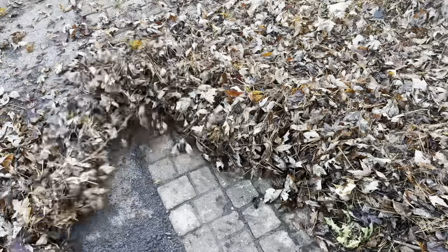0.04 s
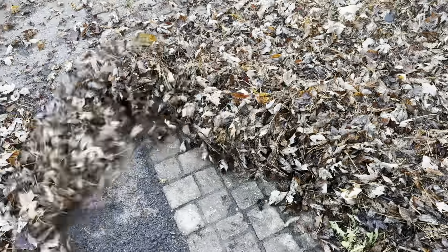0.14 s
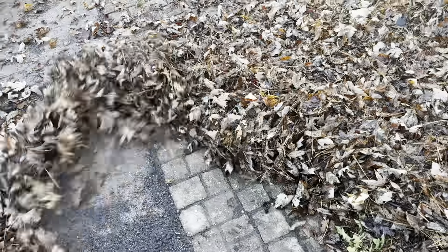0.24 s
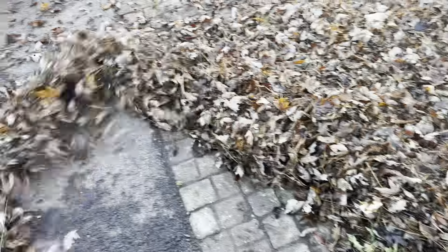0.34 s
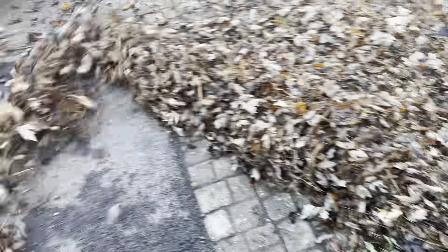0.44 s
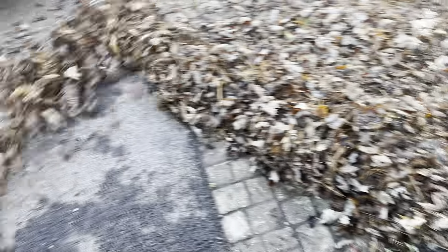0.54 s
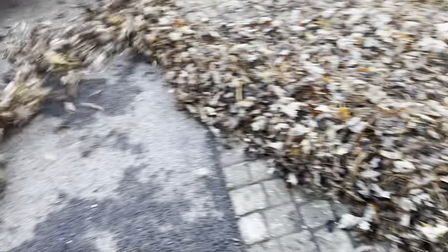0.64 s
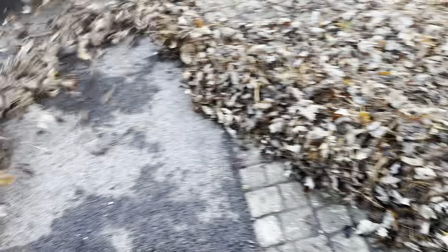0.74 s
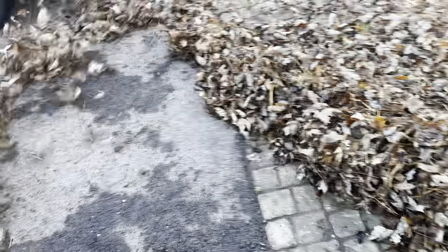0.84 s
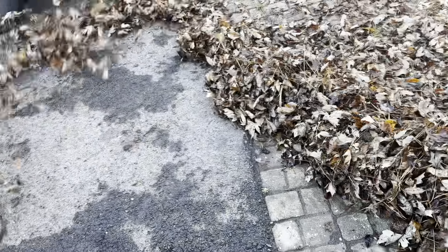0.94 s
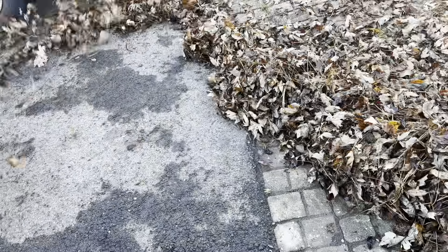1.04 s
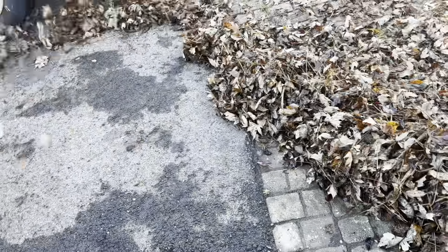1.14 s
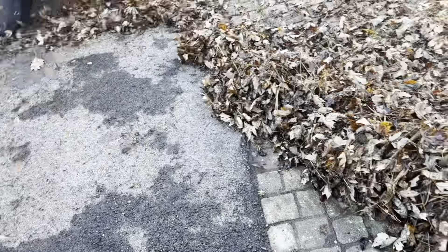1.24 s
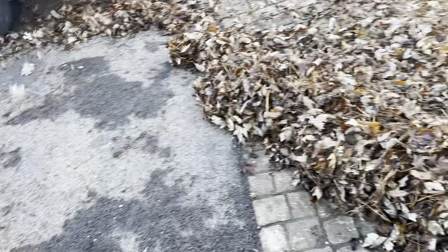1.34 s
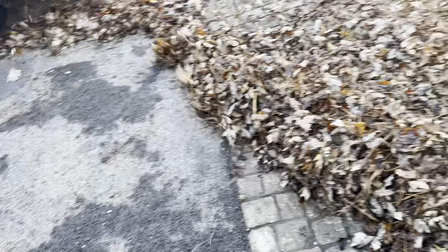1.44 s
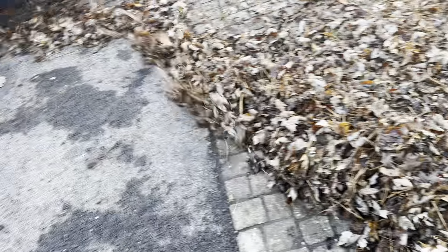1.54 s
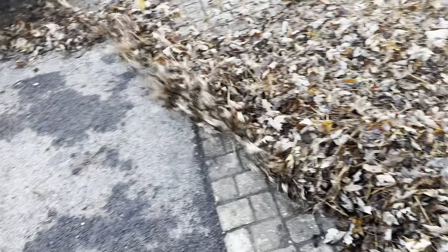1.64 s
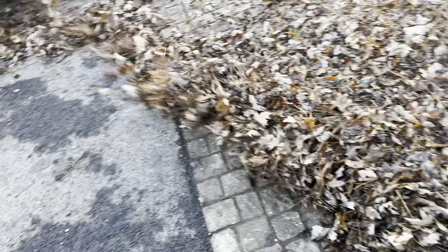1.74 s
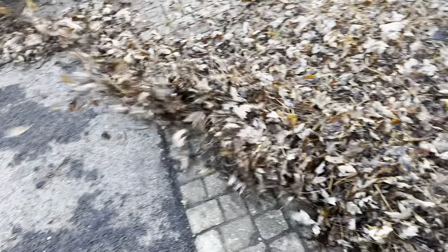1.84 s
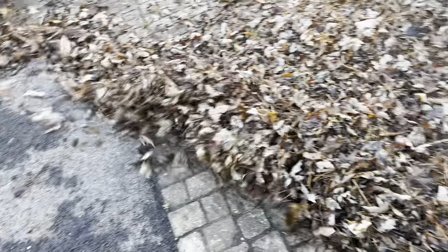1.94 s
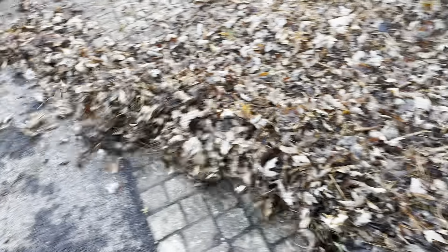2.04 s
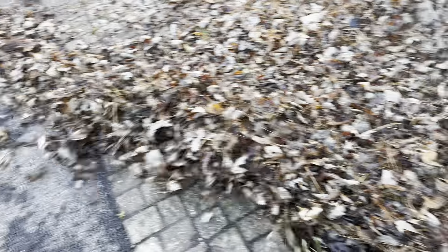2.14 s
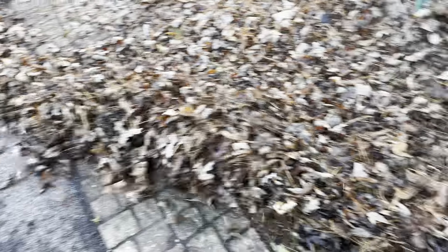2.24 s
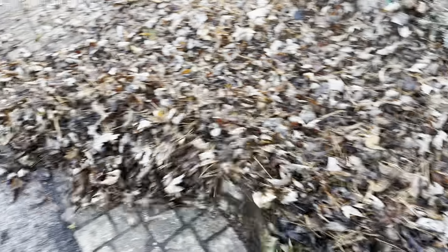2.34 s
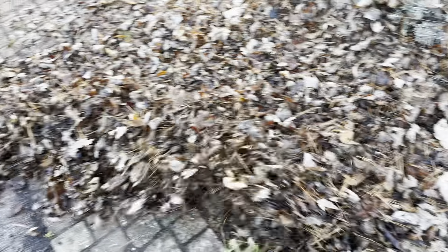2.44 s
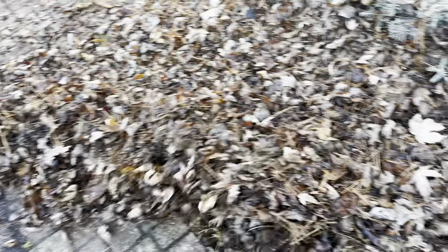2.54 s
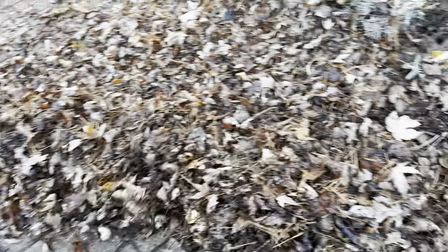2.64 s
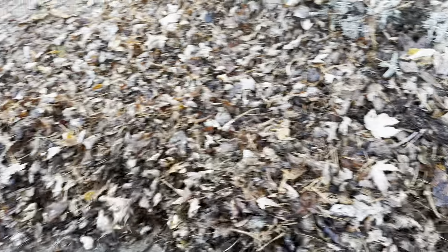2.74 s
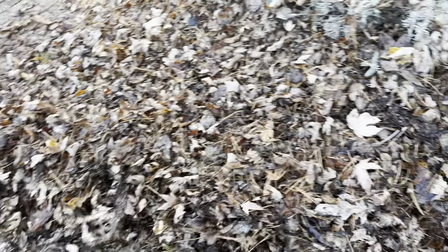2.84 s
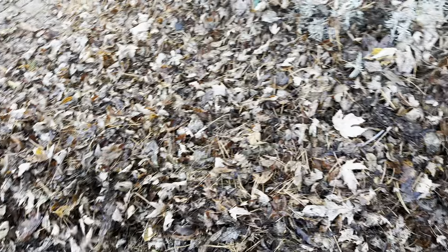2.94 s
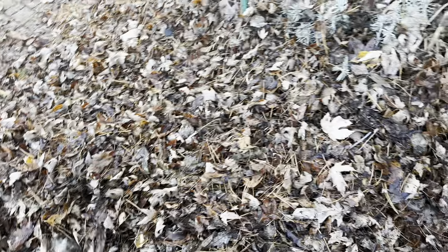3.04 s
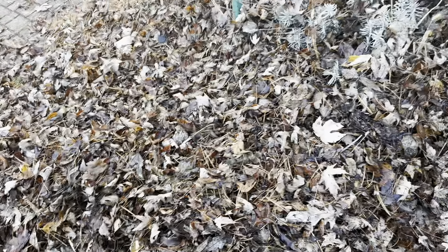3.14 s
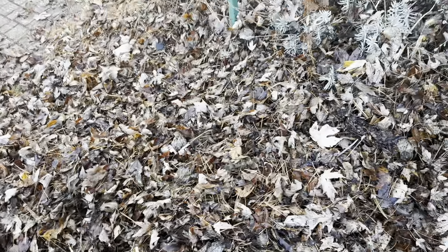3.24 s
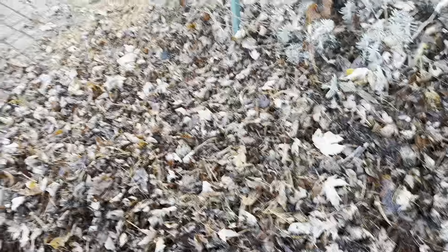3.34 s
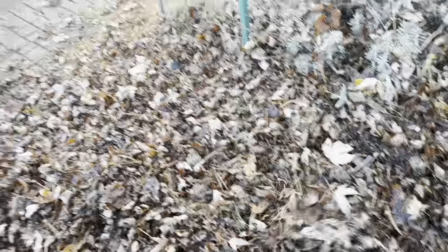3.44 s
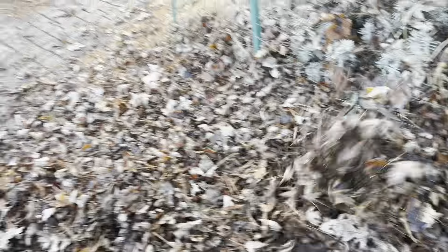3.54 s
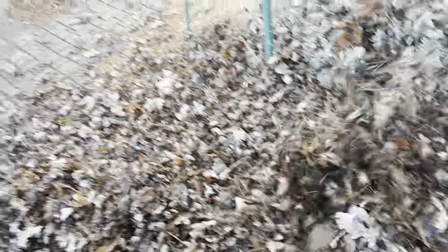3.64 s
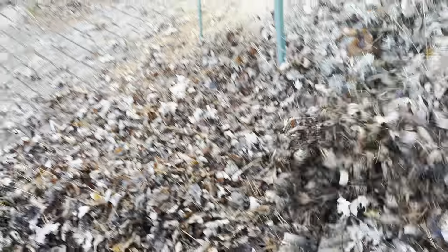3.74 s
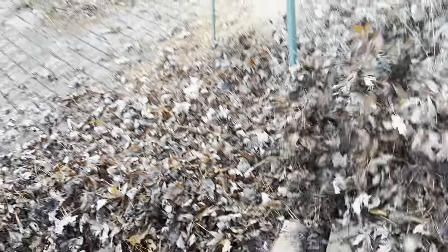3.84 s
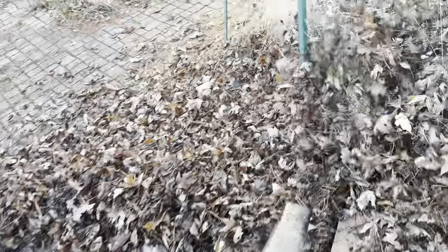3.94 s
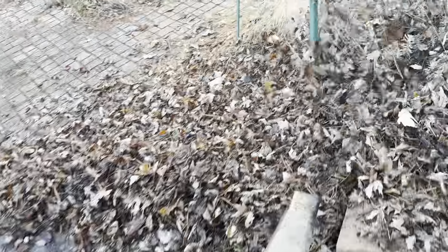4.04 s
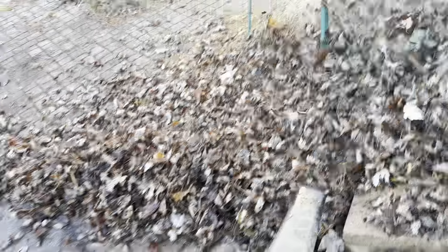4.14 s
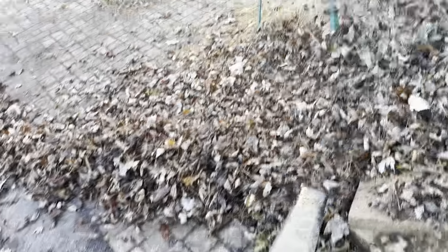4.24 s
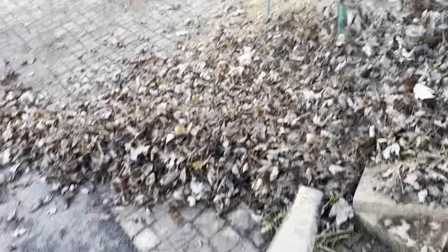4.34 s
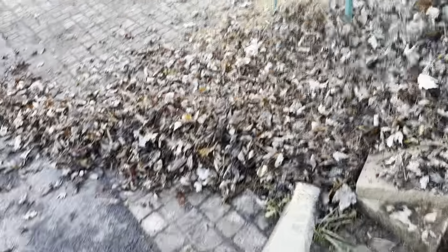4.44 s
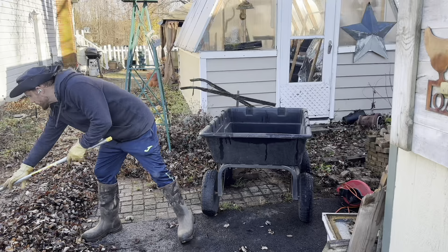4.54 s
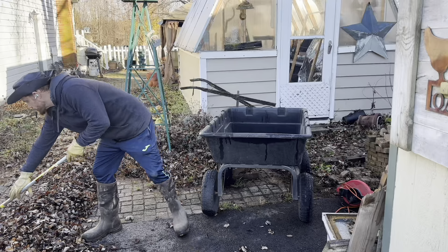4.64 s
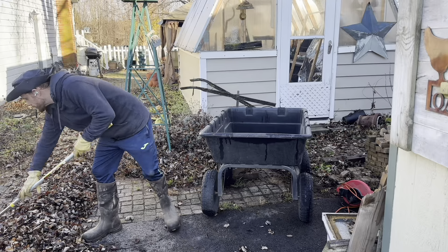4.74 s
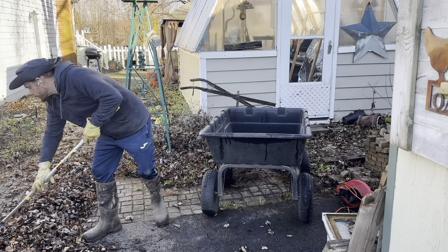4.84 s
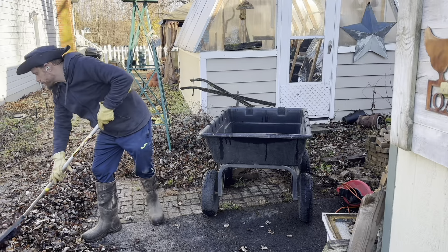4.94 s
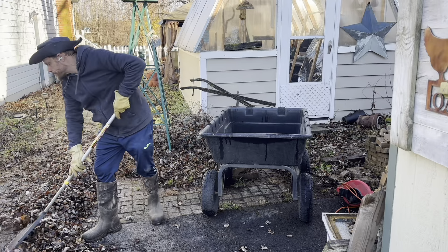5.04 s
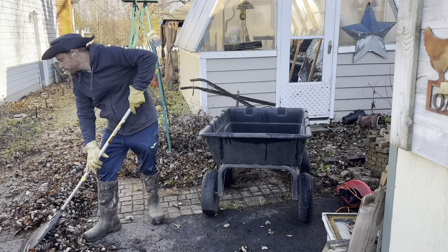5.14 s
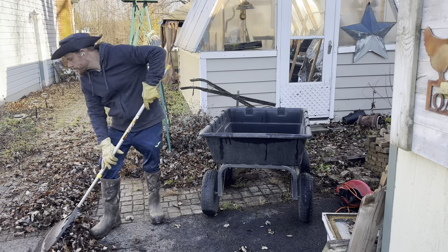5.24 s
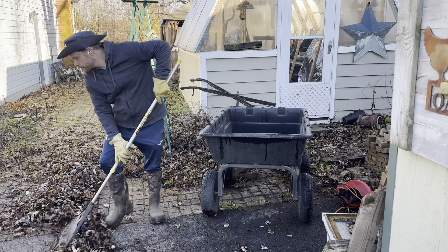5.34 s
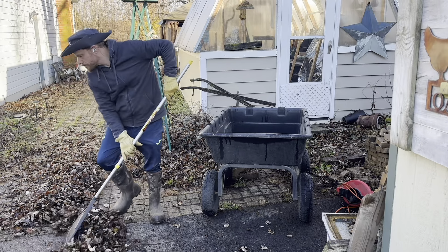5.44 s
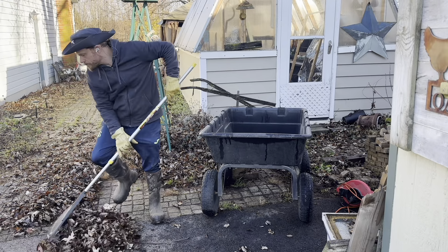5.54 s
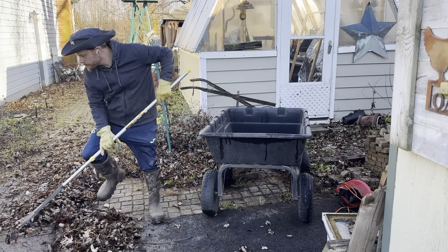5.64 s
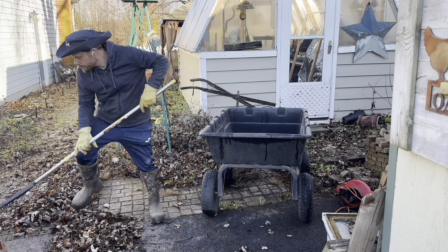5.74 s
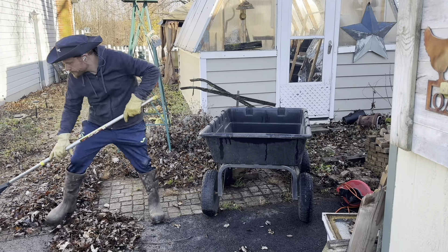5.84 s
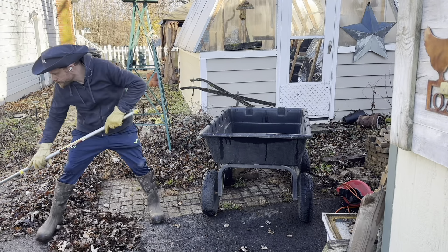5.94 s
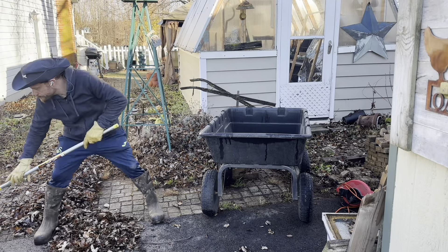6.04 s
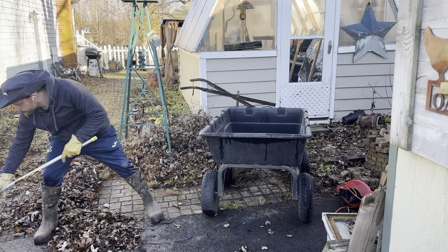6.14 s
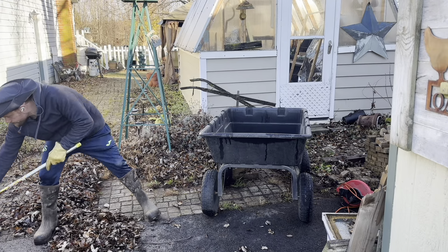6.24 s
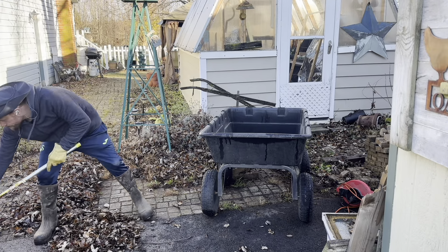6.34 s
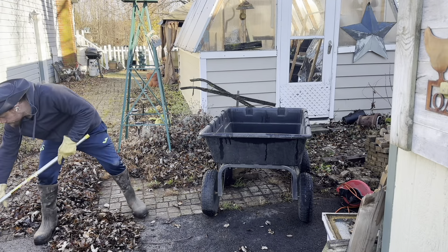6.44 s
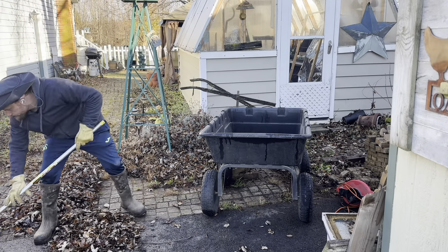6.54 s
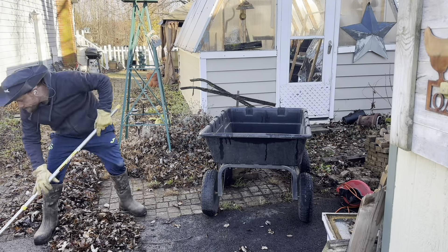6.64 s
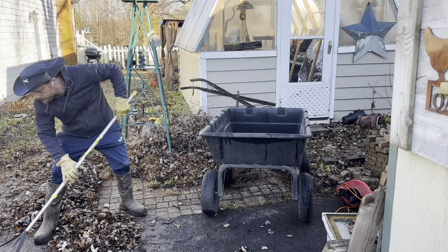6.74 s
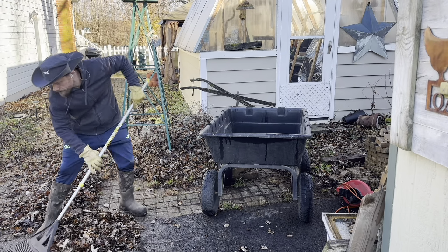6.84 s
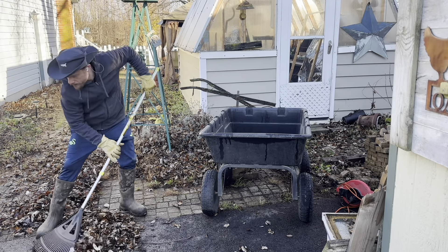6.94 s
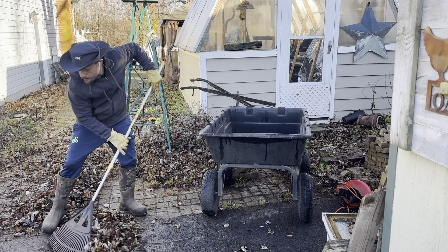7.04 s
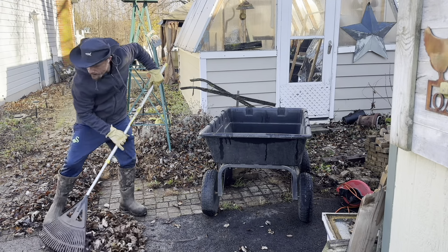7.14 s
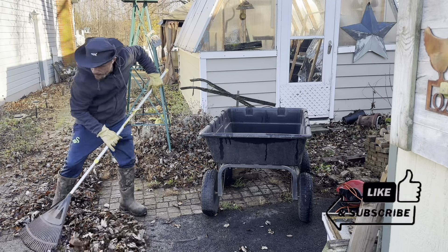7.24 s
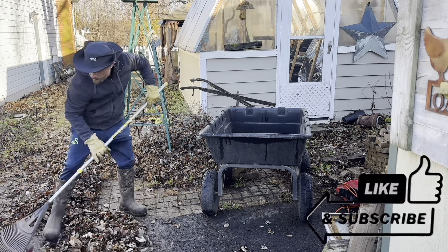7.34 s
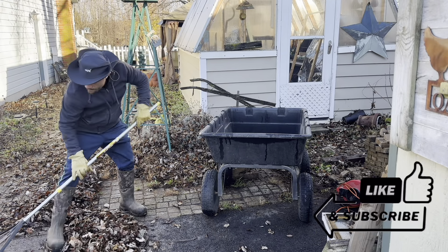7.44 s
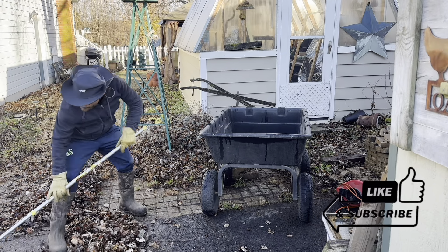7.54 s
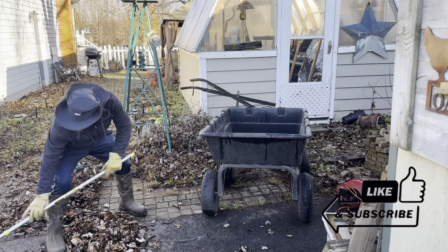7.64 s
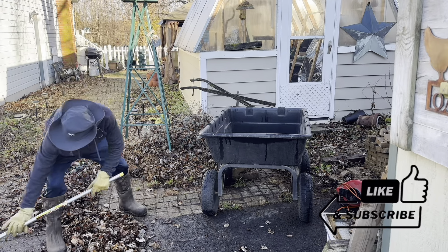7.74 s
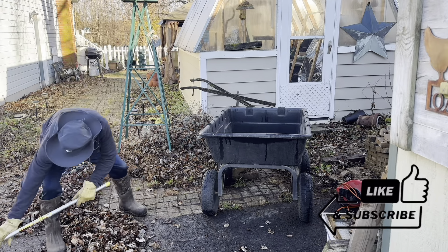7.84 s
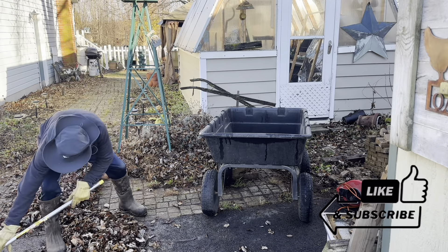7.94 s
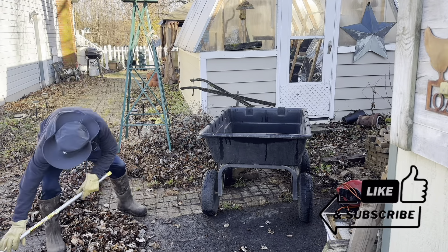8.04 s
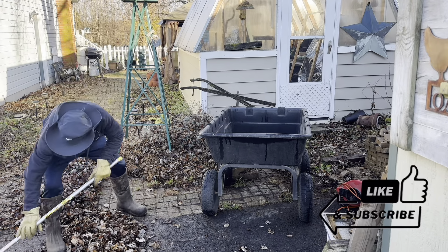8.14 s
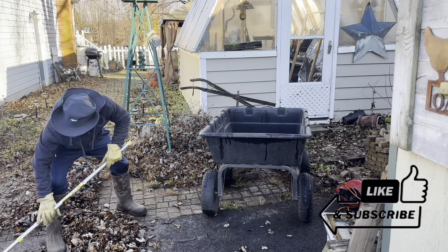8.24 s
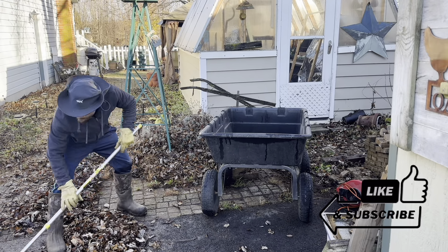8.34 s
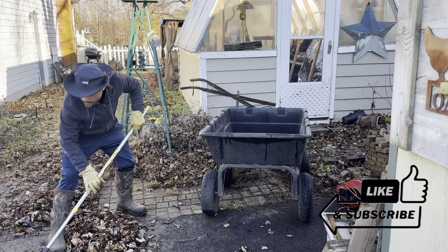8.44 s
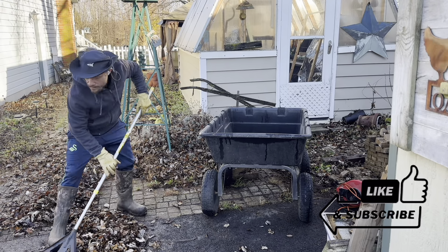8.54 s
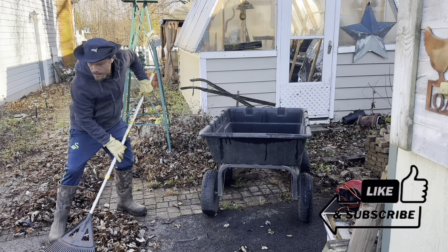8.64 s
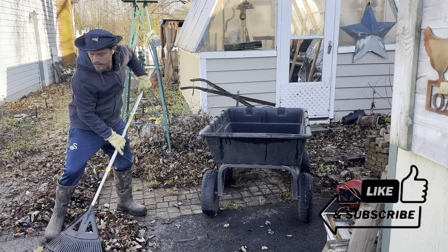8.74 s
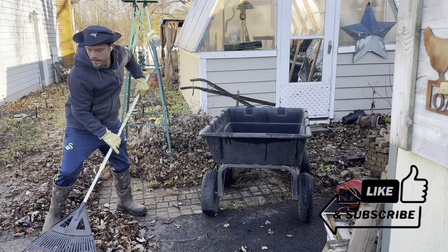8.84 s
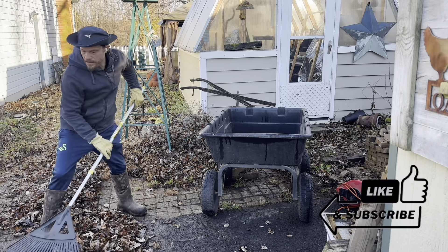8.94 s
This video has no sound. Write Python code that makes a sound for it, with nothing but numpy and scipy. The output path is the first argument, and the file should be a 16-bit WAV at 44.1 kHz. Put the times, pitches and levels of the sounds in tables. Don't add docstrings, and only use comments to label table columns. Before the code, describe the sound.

Handheld blower's steady rushing air and high fan whine stop dead; a plastic rake crackles through dry leaves in separate strokes over faint traffic rumble.

```python
import sys
import numpy as np
from scipy import signal
from scipy.io import wavfile
from scipy.ndimage import uniform_filter1d

SR = 44100
rng = np.random.default_rng(int(sys.argv[2]) if len(sys.argv) > 2 else 0)


def pcm_store(signal):
    levels = np.round(np.clip(np.atleast_2d(signal), -1, 1) * 32767)
    wavfile.write(sys.argv[1], SR, levels.astype(np.int16).T)


def ratio(d):
    e = np.asarray(d, float) / 20
    return 10 ** e


N = 396900
CUT_S = 4.541
T = np.arange(N) / SR
SIZE = 2048
HZ, FRAME_S, _ = signal.stft(T, SR, nperseg=SIZE)

# start_s, tube_roar_db, ground_echo_lag_ms
NOZZLE_PATH = [(0, -25.0, 2.81), (0.28, -28.9, 2.86), (0.51, -27.8, 2.93), (0.84, -27.0, 2.99),
               (1.06, -26.6, 3.04), (1.34, -27.6, 2.88), (1.47, -28.0, 3.0), (1.76, -27.7, 2.93),
               (2.27, -26.5, 2.83), (2.58, -25.6, 2.7), (2.7, -25.8, 2.86), (2.8, -25.9, 2.73),
               (3.19, -25.3, 2.87), (3.36, -25.9, 2.76), (3.58, -25.7, 3.38), (3.95, -25.0, 3.21),
               (4.24, -26.0, 3.27), (4.54, -24.0, 3.3)]
# pitch_hz, level_db (per Hz)
LEAF_MID = [(88, -52), (150, -24), (244, -16), (391, -7.5), (662, -11), (837, -8), (2450, -7), (4580, -1.5),
            (7470, -3), (8070, -6.5), (9440, 2), (11000, -11.5), (15100, -23), (16000, -39)]


def level(x, db):
    return x * ratio(db) / np.sqrt(np.mean(x ** 2))


def shape(table):
    hz, db = np.transpose(table)
    return np.interp(np.log(HZ + 1), np.log(hz), db)[:, None]


def around(hz, octaves):
    return np.exp(-.5 * (np.log2((HZ + 1) / hz) / octaves) ** 2)[:, None]


def bell(t, s, width_s):
    return np.exp(-.5 * ((t - s) / width_s) ** 2)


def swells(t, table):
    return sum(db * bell(t, s, length_s) for s, length_s, db in table)


def resonances(table):
    return sum(db / (1 + ((HZ[:, None] - hz) / (.5 * width_hz)) ** 2) for hz, width_hz, db in table)


def colour(x, db, turn=0):
    z = signal.stft(x, nperseg=SIZE)[2]
    return signal.istft(z * ratio(db) * np.exp(1j * turn), nperseg=SIZE)[1][..., :N]


def walk(rate):
    held = np.repeat(rng.standard_normal(int(N / SR * rate) + 2), 16)
    smooth = uniform_filter1d(uniform_filter1d(held, 16), 16)
    return np.interp(T * rate * 16, np.arange(len(held)), 1.3 * smooth)


def patches(rate, count=24, order=3):
    k = max(int(SR / rate / (SIZE // 2)), 1)
    rows = rng.standard_normal((count, len(FRAME_S)))
    rows = uniform_filter1d(uniform_filter1d(rows, k), k)
    place = np.clip(order * np.log2((HZ + 1) / 70), 0, count - 1.001)
    low, part = place.astype(int), (place % 1)[:, None]
    return ((1 - part) * rows[low] + part * rows[low + 1]) / rows.std()


def port_turn(ports, wander):
    lead, balance = ports
    right = ratio(-shape(balance)) * np.exp(-1j * np.interp(HZ, *np.transpose(lead))[:, None])
    return np.angle((1 - right) / (1 + right)) + wander * patches(1.8)


def grains(rate, scatter_db, tail_s, hiss, apart):
    chance = rng.random((2, N))
    size_db = scatter_db * np.minimum(-np.log(1 - chance[1]), 3)
    clicks = (chance[0] < rate / SR) * ratio(size_db)
    bursts = signal.lfilter([1], [1, -np.exp(-2 / (tail_s * SR))], clicks ** 2)
    mid, other = np.sqrt(bursts / bursts.mean() + hiss ** 2) * rng.standard_normal((2, N))
    return np.array([level(mid, 0), level(mid + apart * other, 0)])


def yard():
    # pitch_hz, level_db (per Hz)
    road_spectrum = [(12, -47), (20, -22), (55, 1), (65, 11), (73, 17), (82, 11), (145, -13.5), (168, -9),
                     (200, -23), (253, -18.5), (300, -20.5), (390, -49), (660, -120)]
    # pitch_hz, level_db (per Hz)
    air_spectrum = [(120, -22), (200, -2), (283, -4.5), (360, -8.5), (538, -7), (1680, -25), (5130, -20.5),
                    (8120, -20), (10700, -24), (13600, -35), (16000, -27.5)]
    # peak_s, length_s, level_db (over the base)
    vehicles = [
        (4.55, 0.18, 4.8),
        (5.151, .1, 3),
        (6.05, 0.44, 4),
        (7.3, 0.39, 2.5),
        (7.95, .15, 4),
        (8.85, .15, 5),
    ]
    swell_db = -45 + swells(T, vehicles) + 1.54 * walk(6)
    road = colour(rng.standard_normal((2, N)), shape(road_spectrum))
    road /= np.sqrt(uniform_filter1d(road ** 2, SR // 12))
    road = road * ratio(swell_db + np.array([[0.3], [-17]]))
    road[1] -= .07 * road[0]
    air_db = shape(air_spectrum) + 6.5 * around(9400, .1) + 1.3 * patches(3.2)
    air = level(colour(rng.standard_normal((2, N)), air_db), -53.5)
    return road + air * ratio(np.array([[0.3], [-2.5]]))


def drone():
    # peak_s, length_s, level_db
    labours = [
        (5.05, .12, -44),
        (5.87, .07, -41),
        (6.2, .3, -38),
        (7.2, .33, -41),
        (7.5, .1, -40),
    ]
    engine_hz = 73 * (1 + .02 * walk(5))
    note = np.sin(2 * np.pi * np.cumsum(engine_hz) / SR) * ratio(3 + 1.5 * walk(9))
    note *= sum(ratio(db) * bell(T, s, length_s) for s, length_s, db in labours)
    return np.array([note, -.07 * note])


def roll():
    # peak_s, length_s, level_db
    lorries = [
        (4.68, .12, -45),
        (5.3, .15, -48),
        (5.72, .2, -39.5),
        (6.25, .2, -43),
        (7.2, .12, -48),
        (7.55, .13, -41.5),
    ]
    band = signal.butter(4, [40, 112], "bandpass", fs=SR, output="sos")
    noise = level(signal.sosfilt(band, rng.standard_normal(N)), 0)
    noise /= np.sqrt(uniform_filter1d(noise ** 2, SR // 10))
    noise *= np.sqrt(sum(ratio(db) ** 2 * bell(T, s, length_s) for s, length_s, db in lorries))
    return np.array([noise, -.07 * noise])


def knock():
    # pitch_hz, level_db, t60_s
    modes = [(111, -30, 0.17), (168, -33, 0.095), (335, -37, .05), (520, -29, .035), (690, -28, 0.025),
             (979.3, -39, 0.035), (1560, -40, .04), (2140, -41, 0.11)]
    ring, start = np.zeros(N), int(5.949 * SR)
    for hz, db, t60 in modes:
        lag_s = .009 if hz < 250 else .0004
        t = np.maximum(T[:SR // 4] - lag_s, 0)
        soft_start = np.minimum(t * hz, 1)
        ring[start:start + len(t)] += ratio(db - 60 * t / t60) * np.sin(2 * np.pi * hz * t) * soft_start
    return np.array([ring, .25 * ring])


def cracks():
    # start_s, peak_db, low_body_db (relative), t60_s
    blows = [(4.6154, -13.5, -31, 0.066), (4.6359, -14, -9.5, 0.03), (4.653, -12.5, -26, 0.023),
             (4.7844, -17, -31, 0.033), (4.7985, -26, -13, 0.04), (4.8475, -11, -29, 0.033),
             (4.9761, -19.5, -27, 0.04), (5.8496, -31, -13, 0.04), (5.9485, -25, -8, .02),
             (5.9518, -22, 1, 0.03), (6.1487, -33, -17, 0.052), (6.237, -23, -9, 0.043),
             (6.3093, -12, -34, 0.054), (6.5634, -24, -21, 0.033), (7.0077, -21, -23, 0.064),
             (7.3322, -34, -22, 0.03), (7.3647, -34, -20, .025), (7.3755, -38, -6, .02),
             (7.484, -31, -7, 0.049), (7.5044, -33, -2, 0.03), (7.5474, -40, -6, 0.03),
             (7.558, -36, -22, .02), (7.5792, -35, -25, .02), (7.597, -40, -14, .03), (7.62, -44, -3, .02),
             (7.885, -27, -21, 0.032), (7.9087, -12.5, -18, 0.05), (8.0644, -21, -17, 0.04),
             (8.1125, -11, -29, 0.04)]
    snap_db = shape(LEAF_MID) + 4 * around(8200, .15) + 9 * around(13500, .4)
    snap = level(colour(rng.standard_normal((2, N)), snap_db), 0)
    body = level(colour(rng.standard_normal((2, N)), 40 * around(530, 2.0)), 0)
    out = np.zeros((2, N))
    for s, db, low_db, t60 in blows:
        i = int(s * SR)
        t = T[:min(SR // 4, N - i)]
        burst = snap[:, i:i + len(t)] * ratio(db - 7.5 - 60 * t / t60)
        burst += body[:, i:i + len(t)] * ratio(db + low_db - 8.0 - 60 * t / (2.4 * t60))
        burst *= np.minimum(t / 0.0012, 1)
        out[0, i:i + len(t)] += burst[0]
        out[1, i:i + len(t)] += .6 * burst[1] + .15 * burst[0]
    return out


def pull(t):
    # land_s, full_pull_s, lift_s, leaves_db, bare_paving_db
    drags = [(4.612, 4.803, 4.88, -26.4, 1.7), (4.928, 4.975, 5.37, -42.5, 6.5),
             (5.121, 5.263, 5.371, -37.5, 1.5), (5.42, 5.461, 5.57, -45, -2.5),
             (5.55, 5.602, 5.87, -53.1, -1.5), (5.777, 5.88, 5.97, -50, -4), (6.138, 6.16, 6.351, -55, -4),
             (6.234, 6.577, 6.903, -26, 1.5), (7.03, 7.087, 7.12, -42.5, -1), (7.12, 7.16, 7.5, -53, -3.5),
             (7.29, 7.448, 7.49, -44.5, -1), (7.46, 7.482, 7.516, -47, 12), (7.52, 7.55, 7.61, -54.4, 2),
             (7.6, 7.66, 7.9, -62, -2), (7.882, 7.892, 7.95, -29, -2.5), (7.973, 8.058, 8.58, -23, -2.5),
             (8.66, 8.7, 8.76, -47.5, 3), (8.75, 8.8, 9.9, -51.5, 2.5), (8.883, 8.97, 8.8, -48.5, -1)]
    # peak_s, length_s, level_db
    load_swells = [(6.255, .02, 1), (6.41, .03, -1.5), (6.47, .025, 1), (6.53, .03, -1.5), (6.625, .025, 2),
                   (6.69, .02, -1), (6.8, .015, -2), (6.84, .02, 1), (6.925, .015, 1.5), (6.955, .015, -2),
                   (7.44, .04, 1.5), (7.61, .02, 2), (7.915, .015, 1.5), (7.97, .03, -3.5), (8.05, .015, 1),
                   (8.09, .012, -2.5), (8.15, .015, 1.5), (8.19, .025, -1.5), (8.3, .05, 2), (8.39, .015, -1),
                   (8.425, .015, 2.5), (8.475, .03, 2), (8.6, .02, -2)]
    rise_db, sag_db_per_s = 9, 5.5
    power, paving, late = 1e-12, 0, 0
    for land, full, lift, db, paving_db in drags:
        stop_db_per_s = 260 if db < -40 else 112 + 9 * max(db + 26.0, 0)
        rising = np.clip((full - t) / (full - land), 0, 1)
        db = db - rise_db * rising - sag_db_per_s * np.maximum(t - full, 0)
        part = (t >= land) * ratio(db - stop_db_per_s * np.maximum(t - lift, 0)) ** 2
        power = power + part
        paving = paving + part * paving_db
        late = late + part * np.clip((t - full) / (lift + 0.063 - full), 0, 1) ** 2
    return 10 * np.log10(power) + swells(t, load_swells), paving / power, late / power


def rings(s, db, hz, t60, spread):
    t = T[:int(.017 * SR)]
    chance = rng.standard_normal((len(s), 9))
    wave = 0
    for k in range(4):
        partial_hz = np.minimum(hz * np.exp(spread * chance[:, k]), 15000)[:, None]
        wave = wave + np.sin(2 * np.pi * (partial_hz * t + chance[:, k + 4, None]))
    wave *= ratio(db[:, None] - 6.5 - 60 * t / t60) * np.minimum(t / 0.0011, 1)
    at = (np.minimum((s * SR).astype(int), N)[:, None] + np.arange(len(t))).ravel()
    leaning = wave * (.15 + 0.49 * chance[:, 8:])
    mid, side = (np.bincount(at, w.ravel(), N + len(t))[:N] for w in (wave, leaning))
    return np.array([mid, side])


def snaps():
    # start_s, peak_db, pitch_hz
    stiff = [(4.6764, -22, 4120), (4.7197, -21, 3930), (4.7454, -13, 5200), (4.7985, -10, 5100),
             (4.9284, -14, 9260), (5.0864, -27, 5690), (5.2574, -24, 4760), (5.2934, -23, 9300),
             (5.4744, -27, 9760), (6.3744, -20, 9970), (6.4264, -16, 7150), (6.4604, -11, 6000),
             (6.6114, -11, 4940), (6.6374, -6, 4610), (6.7274, -14, 4520), (6.775, -11, 4700),
             (6.8364, -12, 5940), (6.8774, -13, 9360), (6.9154, -16, 9150), (8.0384, -12, 7450),
             (8.0744, -13, 3550), (8.1514, -13, 3850), (8.235, -13, 4460), (8.2824, -6, 8200),
             (8.3294, -11, 8900), (8.4198, -6, 9140), (8.4614, -9, 9200), (8.5264, -14, 9270),
             (8.5544, -10, 9140)]
    crinkles_per_s, crinkle_hz, crinkle_octaves = 500, 6000, .45
    chance = rng.random((2800, 4)).T
    s = CUT_S + np.cumsum(-np.log(1 - chance[0])) / crinkles_per_s
    hz = crinkle_hz * 2 ** (crinkle_octaves * np.log(chance[1] / (1 - chance[1])) / 1.7)
    db = pull(s)[0] - 1.5 + 2.6 * np.minimum(-np.log(1 - chance[2]), 3)
    at, peak_db, pitch_hz = np.transpose(stiff)
    crinkles = rings(s, db, hz, t60=.015, spread=0.0603)
    return crinkles + rings(at, peak_db - 6.5, pitch_hz, t60=.03, spread=.14)


def rake():
    # pitch_hz, level_db (per Hz)
    leaf_side = [(88, -57), (150, -30), (414, -18.5), (612, -12), (689, -9.5), (1080, -8), (6140, -6),
                 (8230, 5.5), (9630, 1), (10800, -34), (13200, -38), (14800, -15), (16000, -31)]
    # pitch_hz, left_lead_rad; then pitch_hz, left_minus_right_db
    rake_ports = [
        [(0, -3), (520, -5), (1290, 4.2), (1890, -0.55), (3270, 0), (4220, 10), (6030, 0.7), (8270, 3.5), (9990, -15), (10400, 4), (14000, 4), (14400, -1), (15400, -2.7), (15900, -4)],
        [(60, -1.0), (110, -4), (200, 2), (380, -1), (700, 0.5), (1290, 1), (2380, 1.5), (4400, 2.5), (8120, 2), (15000, -6)],
    ]
    # pitch_hz, width_hz, level_db
    tines = [(1710, 260, 1.5), (3500, 210, 1.5), (4530, 260, 1.5), (5070, 300, 2.5), (6100, 500, -2),
             (7300, 400, 1.5)]
    push_db = np.interp(T, T[::32], pull(T[::32])[0])
    load_db, paving_db, late = pull(FRAME_S)
    light_db = np.clip(-23.5 - load_db, 0, 22.0)
    rate = 350 * ratio(0.17 * (push_db + 31.0))
    rustle = grains(rate, 2.2, .003, 1.8, .6) * ratio(.7 * walk(60))
    moving = 1.1 * patches(40) + 1.6 * patches(14, count=96, order=12)
    moving += resonances(tines)
    moving += around(490, 0.76) * (2.0 + 0.32 * light_db + 0.65 * paving_db - 1.5 * late)
    moving += around(1580, 0.69) * (-.3 + 0.21 * light_db + paving_db + 6.2 * late)
    moving += around(11200, 0.47) * (-4.5 + 0.34 * light_db + 0.15 * paving_db + 3.4 * late)
    mid = colour(rustle[0], shape(LEAF_MID) + moving)
    side = colour(rustle[1], shape(leaf_side) + moving - 1.0, port_turn(rake_ports, 0.51))
    return np.array([mid, side]) * ratio(push_db + 6.5)


def whine():
    # shaft_order, direct_db, echo_share (0-1), echo_offset_cycles, cross_port_db
    echoed = [
        (12, -34.5, 0.89, 0.021, -49.5),
        (23, -35.5, 0.07, 0.58, -42),
        (24, -34.5, 0.76, 0.51, -37.5),
        (36, -49, 0.55, 0.56, -58),
    ]
    # shaft_order, level_db
    steady_tones = [(2, -36), (22, -54), (25, -48), (26, -61)]
    # shaft_order, level_db (relative)
    upper_tones = [(48, -1), (60, -8), (72, -5)]
    # shaft_order, peak_s, length_s, level_db
    tone_swells = [(12, 0, 0.23, 2.6), (12, 1.02, .06, -10), (12, 0.75, .08, 3), (12, 2.75, .1, -5.5),
                   (12, 3, 0.1, 4), (12, 3.47, 0.057, -2.5), (12, 4.5, 0.12, 2), (23, 1, .1, 3),
                   (23, 1.7, .15, 1.5), (23, 1.7, .12, -1), (23, 3.5, .2, -2), (24, 0.98, .07, 3),
                   (24, 1.15, .05, -6), (24, 1.43, .04, -3), (24, 1.83, .08, 3.5), (24, 2.13, .06, -5),
                   (24, 2.53, .04, 5), (24, 2.68, .06, -2), (24, 3.78, .08, -2.5), (24, 4, 0.33, 1.4),
                   (36, 0.9, .15, 4.5), (36, 2, .3, -4), (2, 2.2, .25, -2), (2, 4.2, .35, -2.5),
                   (24, .85, .07, -3), (23, .05, .08, 3), (23, 2.45, .06, -3), (23, 2.75, .05, -3),
                   (25, .6, .15, 4), (25, 1, .08, -5), (25, 1.5, .25, 4), (25, 3.8, .15, 3), (22, .1, .15, 5),
                   (22, 1.85, .1, 5), (22, 4.4, .1, 6), (36, 3.36, .06, 4), (36, 3.75, .08, 3),
                   (22, 2.8, .6, -8.1), (25, 2.5, .6, -8.1)]
    blades, blade_hz = 12, 1456.5
    surge_s, surge_up_s, surge_down_s = 3.25, .2, .33
    t = T[T < CUT_S]
    s, roar_db, lag_ms = np.transpose(NOZZLE_PATH)
    near_db = 0.8 * np.interp(t, s, roar_db - roar_db.mean())
    lag_s = np.interp(t, s, lag_ms) / 1000
    surge = bell(t, surge_s, np.where(t < surge_s, surge_up_s, surge_down_s))
    shade_db = -5 * bell(t, 3.49, .1)
    hz = blade_hz + 15.5 * bell(t, np.clip(t, surge_s, surge_s + .16), .17)
    turn = 2 * np.pi * np.cumsum(hz) / blades / SR + .006 * walk(20)[:len(t)]
    swing_db = np.minimum(-11.5 + 5 * t, 2.5)
    lean = np.tanh(swing_db * np.log(10) / 40)
    uneven_db = 5 * surge - 1.4 * (t - 2.33) ** 2
    run_up_db = shade_db + 10 * bell(t, 3.09, surge_up_s)
    extra_db = [near_db, uneven_db, shade_db, run_up_db]
    tones = []
    for (k, db, echo, cycles, across_db), more_db, share in zip(echoed, extra_db, [.2, lean, lean, .2]):
        both = 1 + echo * np.exp(2j * np.pi * (k * hz / blades * lag_s + cycles))
        tones.append((k, db + more_db + 20 * np.log10(np.abs(both)), share, across_db))
    thrice_db = tones[-1][1]
    tones += [(k, db, .1, db - 20) for k, db in steady_tones]
    tones += [(k, 0.63 * (thrice_db + 44.5) - 42 + db, .1, -56) for k, db in upper_tones]
    out = np.zeros((2, N))
    for k, db, share, across_db in tones:
        phase = k * turn
        db = db + sum(more * bell(t, at, length_s) for which, at, length_s, more in tone_swells if which == k)
        shake_db = .7 if k in (2, blades, 2 * blades) else 1.6
        mid = ratio(db + shake_db * walk(12)[:len(t)]) * np.sin(phase)
        across = ratio(across_db + walk(2.8)[:len(t)]) * np.cos(phase)
        out[:, :len(t)] += ratio(3.5) * np.array([mid, share * mid + across])
    return out


def jet():
    # pitch_hz, level_db (per Hz)
    jet_mid = [(18, -59), (30, -29.5), (187, -7.5), (239, -0.5), (1310, -9.5), (1450, -13.5), (1560, -10.5),
               (2440, -16.5), (2830, -14), (3200, -17), (4870, -20), (5650, -15.5), (9030, -15.5),
               (10200, -25.5), (11000, -38), (14300, -60), (15200, -34), (15900, -34), (22000, -120)]
    # pitch_hz, level_db (per Hz)
    jet_side = [(35, -75), (60, -34), (715, 0), (1380, -11), (1470, -44.5), (1580, -33), (2090, -24),
                (2840, -13), (3190, -20), (5090, -8), (5720, -25), (6140, -75), (7060, -16.5), (8710, -7),
                (16000, -32.5)]
    # pitch_hz, left_lead_rad; then pitch_hz, left_minus_right_db
    jet_ports = [
        [(0, -1.5), (690, 2), (1120, -2.9), (2330, 2), (3010, -1.0), (3360, 0.5), (3960, 1.1), (4390, -2), (5430, -8), (6800, -6), (7750, -7), (9910, -9), (10400, 3), (15900, 3)],
        [(60, 8), (110, -1), (200, -1), (380, 1.0), (700, 11), (1290, 11), (2380, 0.5), (4400, 0.5), (8120, -0.5), (15000, 1)],
    ]
    # pitch_hz, width_hz, level_db
    tube = [(245, 70, -4), (280, 40, -3), (350, 90, 2), (480, 50, 3), (540, 50, -2), (800, 50, -3),
            (1060, 150, 2), (4300, 600, 2), (4950, 250, -9)]
    # peak_s, length_s, level_db
    booms = [
        (.7, .08, 3),
        (.98, .12, -3),
        (1.3, .08, 2),
        (1.9, .08, 1.5),
        (3.12, .13, 2.5),
        (4.3, .15, -1.5),
    ]
    # peak_s, length_s, level_db
    gusts = [
        (1.355, 0.13, 9),
        (3.35, 0.27, 7),
        (4.0, 0.083, 11),
    ]
    s, roar_db, lag_ms = np.transpose(NOZZLE_PATH)
    lull_db = roar_db.mean() - np.interp(FRAME_S, s, roar_db)
    echo_ms = np.interp(FRAME_S, s, lag_ms)
    air = grains(600, 2.2, 0.003, 2.2, 0.81) * (1 + 0.02 * np.sin(2 * np.pi * 130.0 * T))
    moving = 0.77 * patches(4) + 1.03 * patches(12)
    moving += resonances(tube)
    cycles = np.outer(HZ, echo_ms) / 1000
    moving += 20 * np.log10(np.abs(1 + .52 * around(650, 1.05) * np.exp(-2j * np.pi * cycles)))
    moving -= 2.3 * around(264, 0.55) * (echo_ms - 2.9)
    stone_db = 3.5 * bell(FRAME_S, 2.83, 0.69)
    moving += around(2130, 0.39) * (0.5 * lull_db - 1.2 + stone_db)
    cleared_db = 8 * np.clip(FRAME_S - 3.48, 0, .4)
    moving += around(7500, 1.0) * (0.73 * lull_db + .6 - cleared_db)
    moving += around(400, .45) * swells(FRAME_S, booms)
    moving += around(45, 1.0) * (swells(FRAME_S, gusts) - 3)
    mid = level(colour(air[0], shape(jet_mid) + moving), 1.68)
    side = level(colour(air[1], shape(jet_side) + moving, port_turn(jet_ports, 0.46)), -5.5)
    return np.array([mid, side]) * ratio(np.interp(T, s, roar_db))


def scene():
    first = np.clip((CUT_S - T) / 0.001, 0, 1)
    blowing = whine() + jet()
    raking = yard() + drone() + roll() + knock() + cracks() + snaps() + rake()
    mid, side = first * blowing + (1 - first) * raking
    return np.array([mid + side, mid - side])


def top_cut(x):
    return signal.sosfilt(signal.butter(12, 15830, fs=SR, output="sos"), x)


def record(dry):
    # start_s, end_s, channel (0 sum, 1 difference), low_hz, high_hz, dropped_share (0-1)
    dropouts = [(0, 4.53, 0, 10000, 10330, .15), (0, 4.53, 0, 10330, 10670, .55),
                (0, 4.53, 0, 10670, 11200, .86), (0, 4.53, 0, 11200, 15200, 1),
                (0, 1.2, 0, 15200, 15800, .78), (1.2, 2, 0, 15200, 15800, .92),
                (2, 4.53, 0, 15200, 15800, .99), (0, 4.53, 0, 15800, 17000, 1),
                (4.56, 9, 0, 8050, 8250, .18), (0, 4.53, 0, 4850, 5060, .1), (0, 4.53, 1, 5750, 6850, 1),
                (0, 4.53, 1, 1600, 2250, .8), (0, 4.53, 1, 3400, 4000, .12),
                (0, 4.53, 1, 13500, 15800, .35), (4.56, 9, 1, 10450, 14000, 1),
                (4.56, 9, 1, 14000, 15900, .5), (4.6, 5.5, 0, 10600, 14800, .18),
                (6.25, 7.1, 0, 10600, 14800, .2), (7.9, 8.7, 0, 10600, 14800, .22),
                (4.56, 9, 0, 15150, 15900, .62), (4.56, 9, 0, 14450, 15150, .15)]
    attacks = [
        4.616,
        5.851,
        5.951,
        7.887,
        8.113,
    ]
    pair = np.array([dry[0] + dry[1], dry[0] - dry[1]]) / 2
    steady = np.abs(FRAME_S[:, None] - attacks).min(axis=1) > .012
    luck = rng.random((2, len(HZ) // 16 + 1, len(FRAME_S) // 2 + 1))
    luck = luck.repeat(16, axis=1).repeat(2, axis=2)[:, :len(HZ), :len(FRAME_S)]
    flecks = rng.random((2, len(HZ) // 32 + 1, len(FRAME_S))).repeat(32, axis=1)[:, :len(HZ)]
    luck = np.where(HZ[:, None] > 15150, flecks, luck)
    dropped = np.zeros(luck.shape, bool)
    for start, end, which, low_hz, high_hz, share in dropouts:
        in_band = (HZ > low_hz) & (HZ <= high_hz)
        in_time = (FRAME_S >= start) & (FRAME_S <= end) & steady
        dropped[which] |= np.outer(in_band, in_time) & (luck[which] < share)
    mid, side = colour(pair, -70. * dropped)
    return top_cut(np.array([mid + side, mid - side]))


dry = scene()
out = record(dry)
pcm_store(out)
```